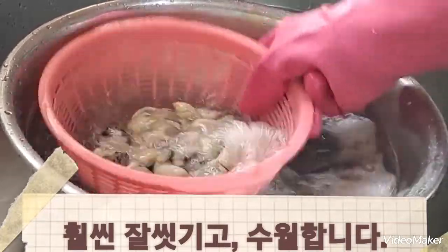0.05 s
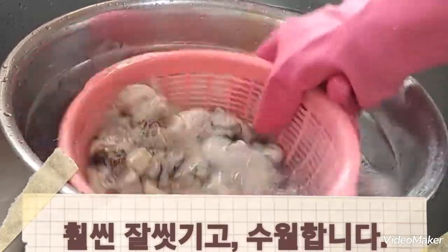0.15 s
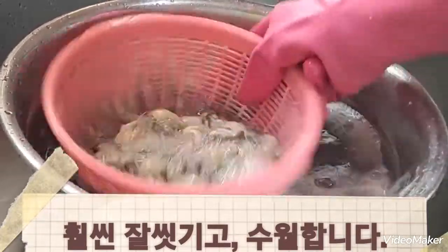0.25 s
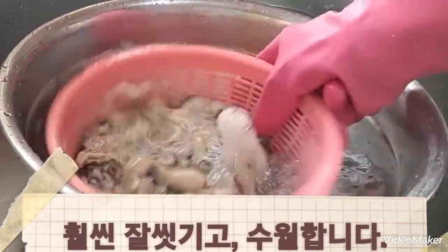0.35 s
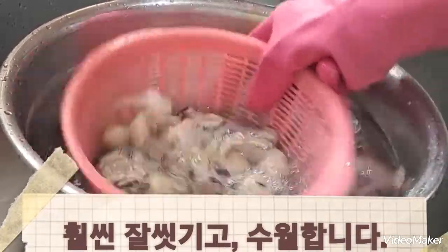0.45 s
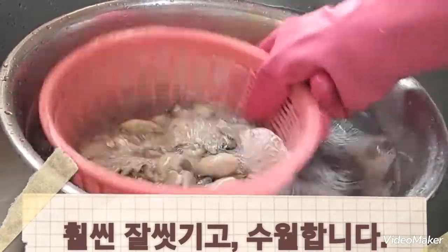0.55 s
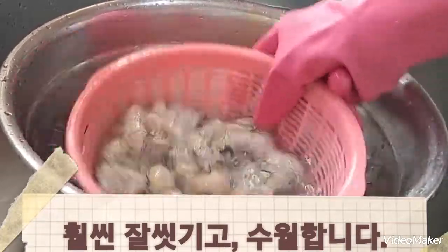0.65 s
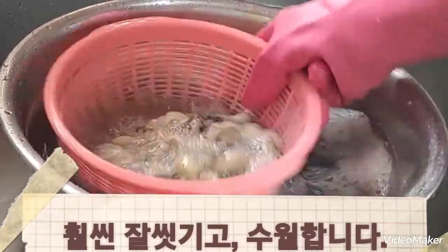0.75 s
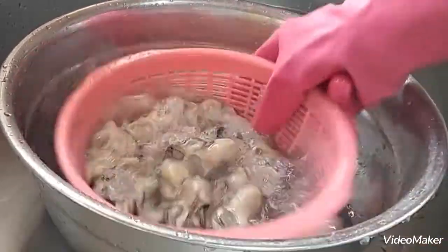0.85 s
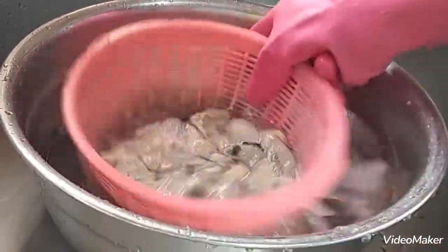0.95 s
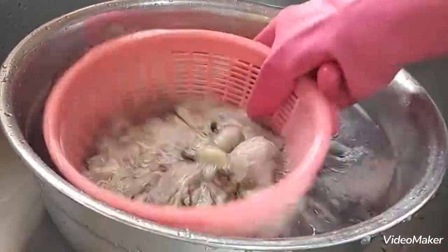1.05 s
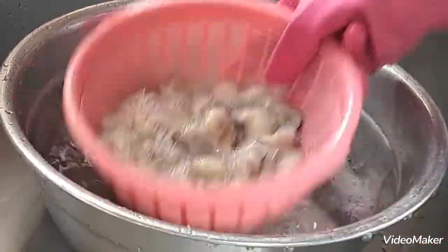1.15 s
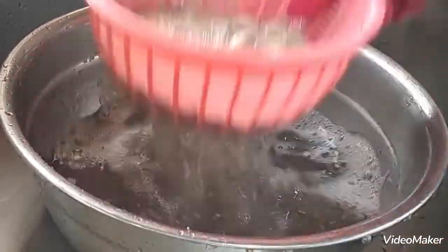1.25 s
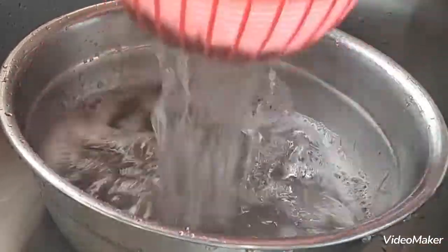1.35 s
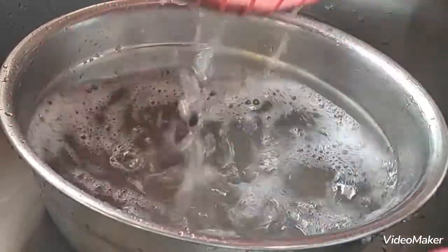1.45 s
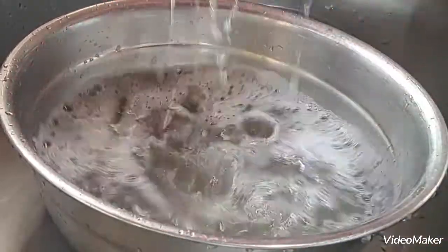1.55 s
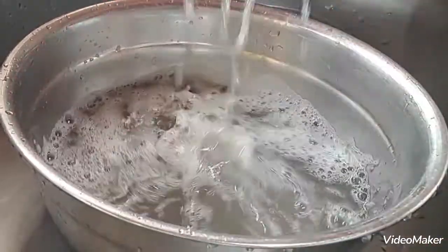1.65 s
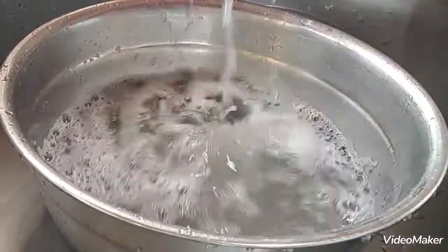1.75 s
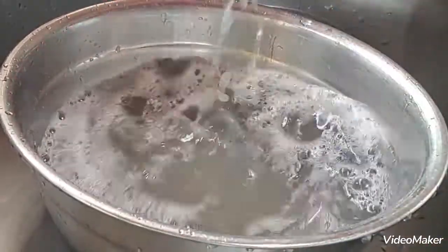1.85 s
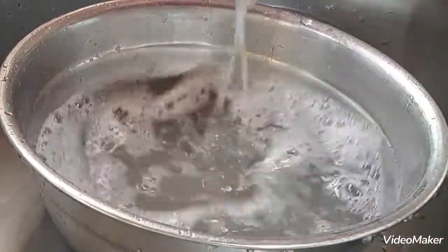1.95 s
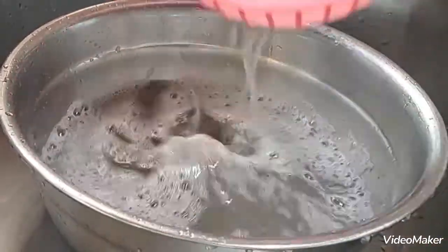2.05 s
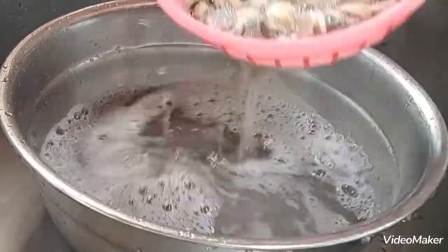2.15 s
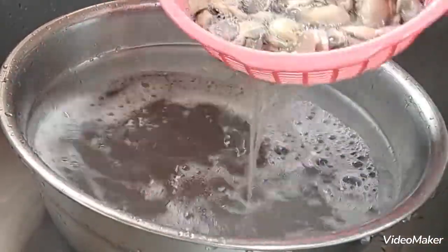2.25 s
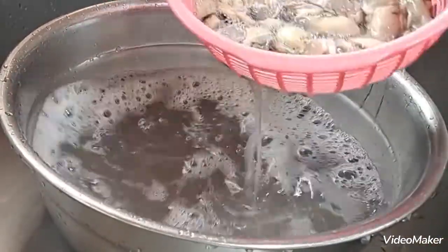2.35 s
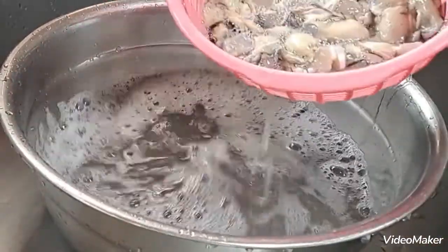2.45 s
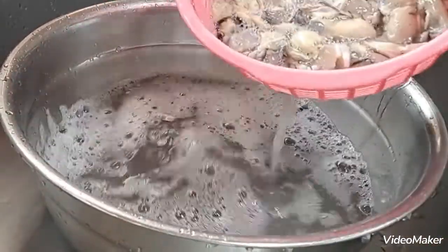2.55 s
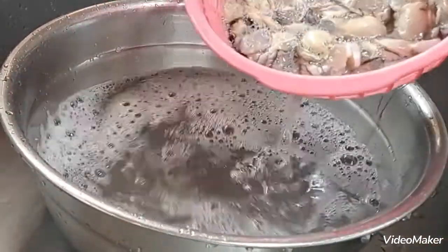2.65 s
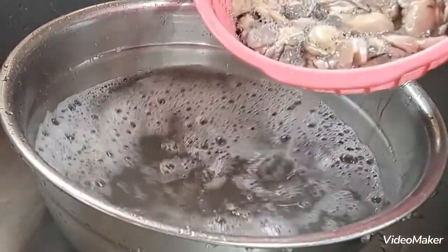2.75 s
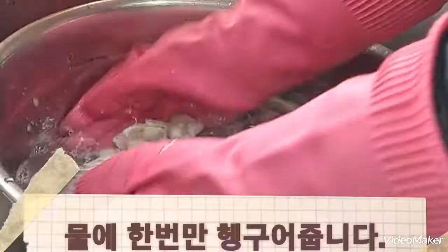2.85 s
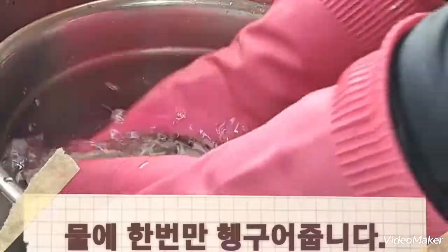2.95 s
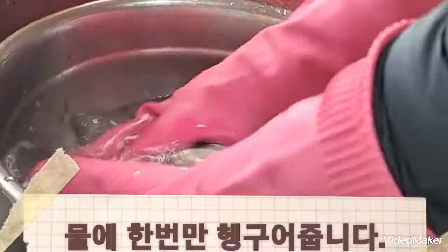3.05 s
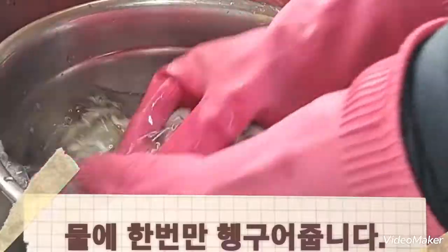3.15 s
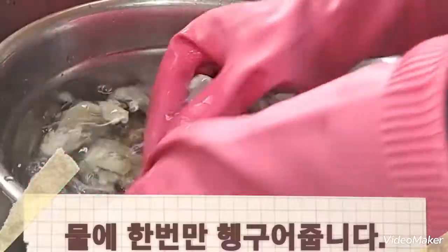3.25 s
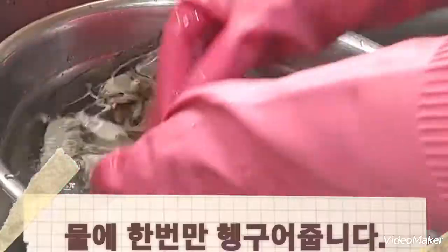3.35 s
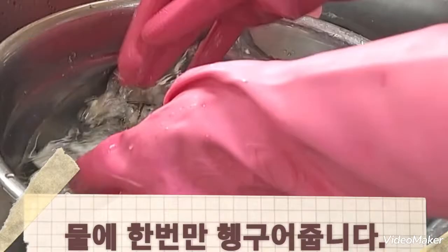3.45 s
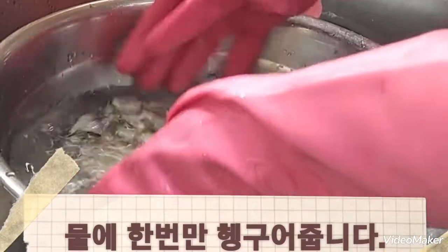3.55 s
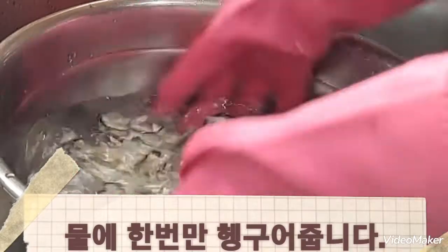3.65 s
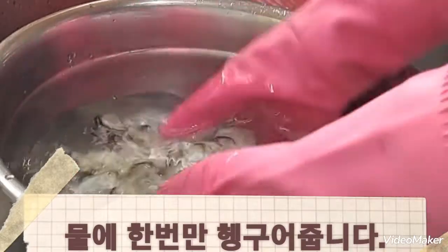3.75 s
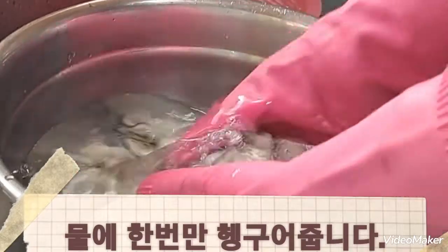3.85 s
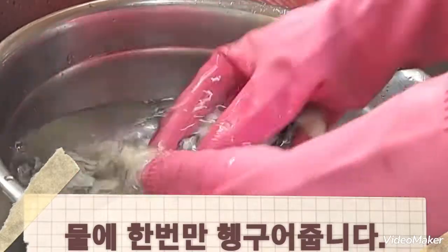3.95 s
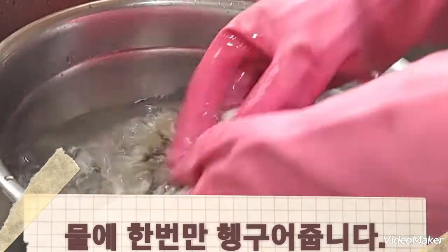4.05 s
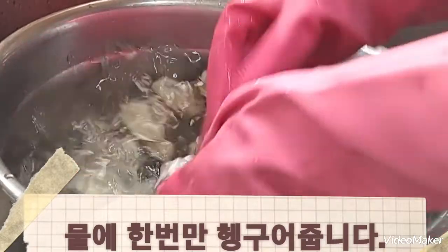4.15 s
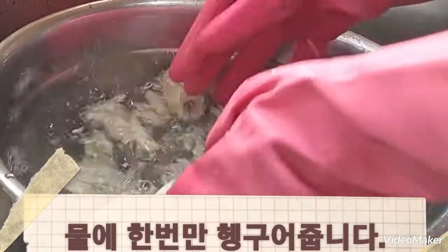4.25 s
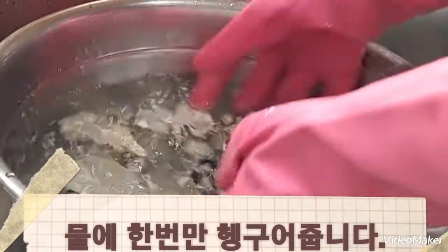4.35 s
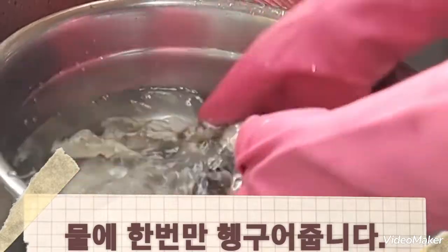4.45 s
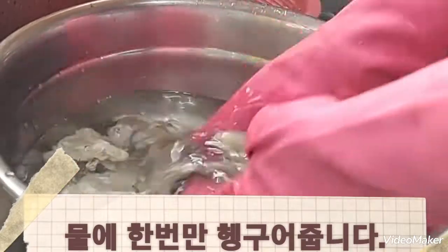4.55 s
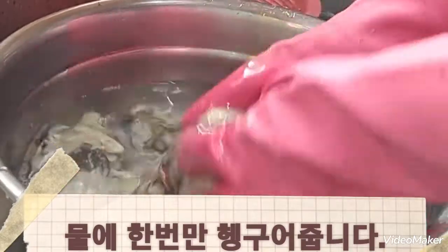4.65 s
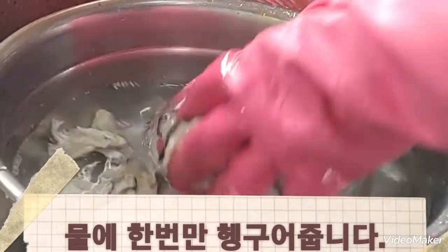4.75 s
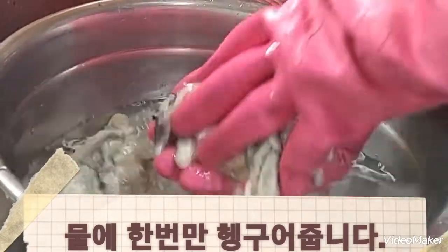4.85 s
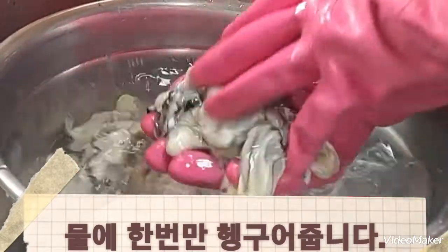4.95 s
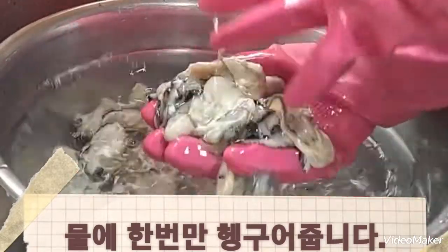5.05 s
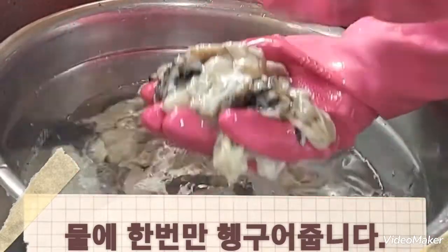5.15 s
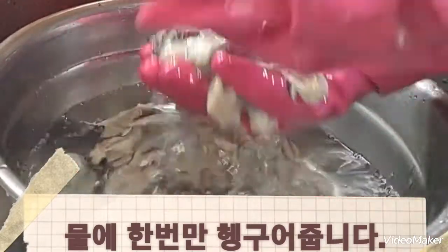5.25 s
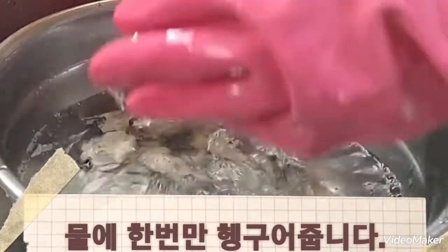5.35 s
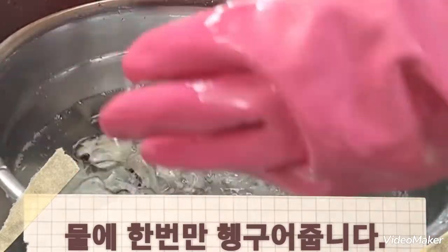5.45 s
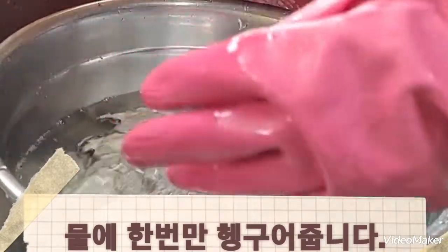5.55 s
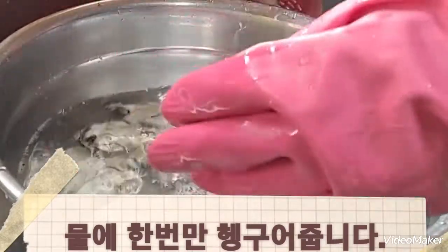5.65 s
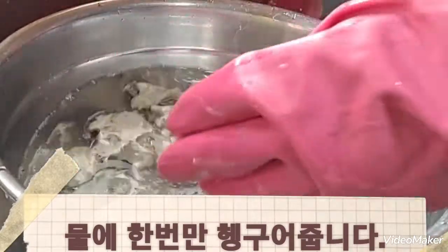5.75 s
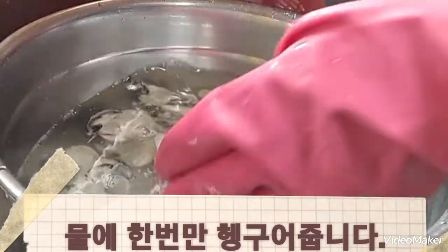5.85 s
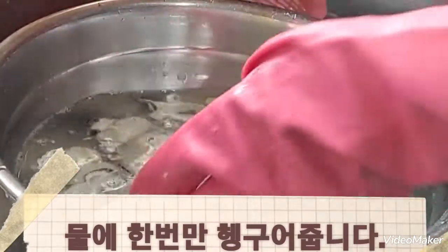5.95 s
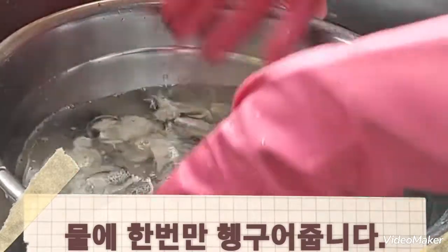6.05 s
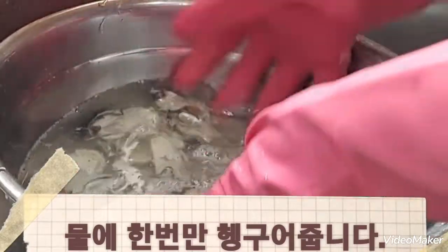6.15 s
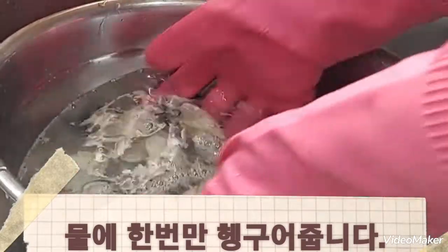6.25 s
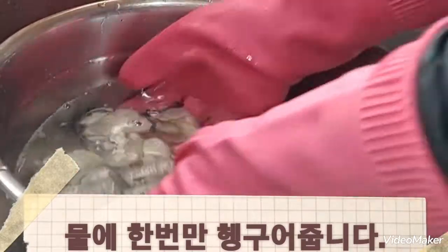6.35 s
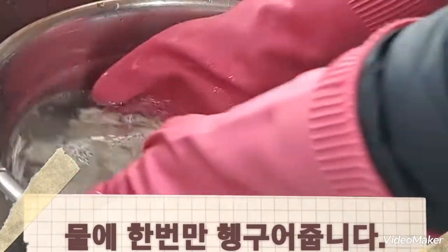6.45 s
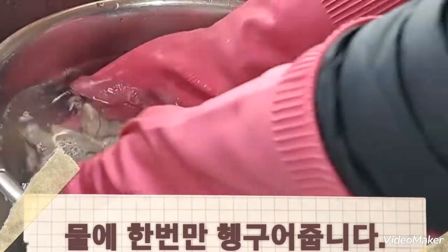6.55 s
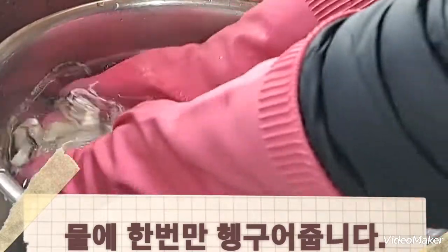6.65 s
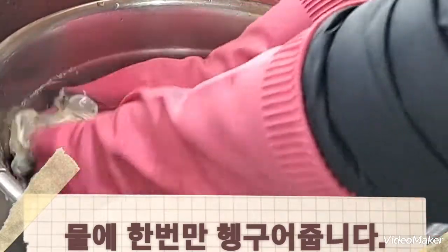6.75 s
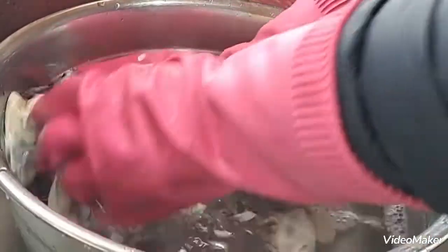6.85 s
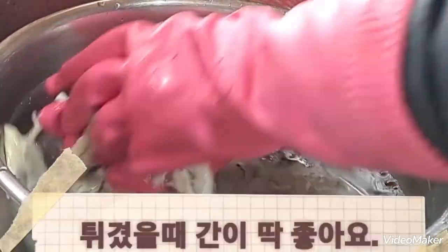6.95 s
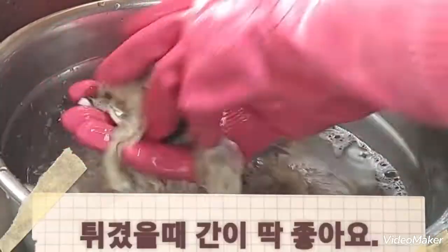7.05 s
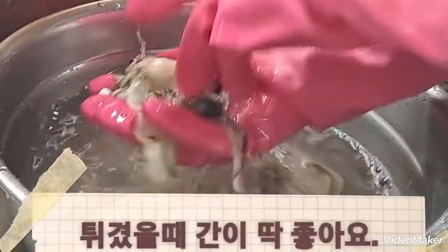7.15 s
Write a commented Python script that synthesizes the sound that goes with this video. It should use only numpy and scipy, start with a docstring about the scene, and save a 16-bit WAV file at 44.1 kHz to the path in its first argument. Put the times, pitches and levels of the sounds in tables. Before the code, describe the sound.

Shellfish swished in a plastic colander thump rhythmically in a steel basin of water, then drain and are splashed about by hand.

```python
"""In a small kitchen, shellfish are rinsed in a steel basin of water. A plastic colander knocks the basin floor,
is lifted and drains; then gloved hands turn the food over. Struck modes ring as decaying sines, trapped air as
sines that climb in pitch, drops as short noise bursts and ticks. Shaped noise makes the surge, churn and spray,
and banded noise the rushing and slopping water. The level of the whole sound dips twice, briefly."""
import sys
import numpy as np
from scipy import signal
from scipy.fft import rfft, irfft, next_fast_len
from scipy.io import wavfile

SR = 44100
rng = np.random.default_rng(int(sys.argv[2]) if len(sys.argv) > 2 else 0)


def put_to_file(sound):
    """Save the sound as 16-bit audio at rate SR, in the file named by the first command-line argument."""
    columns = np.atleast_2d(sound).T  # one column per channel
    safe = np.clip(columns, -1, 1)
    whole_steps = np.round(safe * 32767)
    wavfile.write(sys.argv[1], SR, whole_steps.astype(np.int16))


N = 317520

# Blows on the basin. Each row: time in seconds, relative drive of the floor modes in dB, of the wall modes in dB.
KNOCK_ROWS = [(0.164, -9, -22), (0.401, -9.5, -22.5), (0.649, -11.5, -27.5), (0.889, -8.5, -22),
              (1.085, -15.5, -29), (1.503, -36, -43), (3.905, -22, -65), (5.786, -25, -28.5),
              (5.874, -21, -13.5), (5.917, -25, -19)]
COLANDER_OUT_S = 1.2        # until then every blow is a stroke of the colander
LEFT_DB, LEFT_LAG = -2.3, 2   # the basin sits nearer the right side (dB, samples)


def from_db(db):
    """Amplitude ratio: 20 dB stand for a factor of ten."""
    return 10 ** (np.asarray(db) / 20)


def rms_one(x):
    """Normalization to unit mean power."""
    return x / np.sqrt(np.mean(x ** 2) + 1e-20)


def in_time(rows):
    """Linear interpolation of every column over the times in the first."""
    s, *columns = np.transpose(rows)
    return [np.interp(np.arange(N) / SR, s, column) for column in columns]


def drift(rate_hz):
    """Low-passed chance: two equal poles at the rate leave a slow wander with spread 1."""
    step = 40   # samples between computed points
    r = np.exp(-2 * np.pi * rate_hz * step / SR)
    white = rng.standard_normal(N // step + 2002)
    slow = signal.lfilter([1], [1, -2 * r, r * r], white)[2000:]   # the start-up is left out
    return np.interp(np.arange(N) / step, np.arange(len(slow)), rms_one(slow))


def coloured(x, spectrum):
    """Spectral shaping: white input takes on the given spectrum, at rms 1."""
    hz, db = np.transpose(spectrum)
    grid = np.maximum(np.arange(N // 2 + 1) * SR / N, 1)
    gain_db = np.interp(np.log(grid), np.log(hz), db, left=-90, right=-90)
    return rms_one(irfft(rfft(x) * from_db(gain_db), N))


def ring(clicks, hz, t60):
    """Damped resonance: a unit click sets a sine of height 1 ringing, 60 dB down after t60 seconds."""
    r, w = from_db(-60 / (t60 * SR)), 2 * np.pi * hz / SR
    return signal.lfilter([0, np.sin(w)], [1, -2 * r * np.cos(w), r * r], clicks + 1e-18)


def add(out, sound, s, pan_db=LEFT_DB, lag=LEFT_LAG):
    """Stereo by level and arrival time: a mono sound enters both channels, later on the left."""
    for side, start, db in zip(out, [int(s * SR) + lag, int(s * SR)], [pan_db / 2, -pan_db / 2]):
        side[start:start + len(sound)] += sound[:max(N - start, 0)] * from_db(db)


def spread(white, alike, lag=LEFT_LAG):
    """Partial coherence: of three noise draws one is shared by both channels, one is own to each."""
    out = np.sqrt(1 - alike) * white[1:] * from_db([[LEFT_DB / 2], [-LEFT_DB / 2]])
    add(out, np.sqrt(alike) * white[0], 0, lag=lag)
    return out


def patchy(x, edges_hz, patchy_db, rate):
    """Independent modulation: every frequency band swells and sinks on its own."""
    total = 0
    for k, edges in enumerate(zip(edges_hz, edges_hz[1:])):
        band = signal.butter(2, edges, "band", fs=SR, output="sos")
        swell = from_db(patchy_db * drift(rate))
        total = total + (-1) ** k * swell * signal.sosfilt(band, x)
    return total


def bursts(rows, width_octaves, rise_s, alike, lag=LEFT_LAG):
    """Transient noise: a band rises fast and dies; rows of (seconds, dB, centre Hz, t60 in seconds)."""
    out = np.zeros((2, N))
    for s, db, hz, t60 in rows:
        t = np.arange(int(np.clip(t60, .01, 1 / 3) * SR)) / SR
        white = rng.standard_normal((2, len(t)))
        edges = np.clip([hz / 2 ** width_octaves, hz * 2 ** width_octaves], 20, .45 * SR)
        noise = signal.sosfilt(signal.butter(2, edges, "band", fs=SR, output="sos"), white)
        shape = from_db(db) * (1 - np.exp(-t / rise_s)) * from_db(-60 * t / t60)
        add(out, shape * rms_one(noise[0]), s, lag=lag)
        wall_pan_db = LEFT_DB + 12 * rng.choice([-1, 1])   # scattered off one wall
        add(out, (1 - alike) * shape * rms_one(noise[1]), s, wall_pan_db, 0)
    return out


def wash(surge_db, churn_db, spray_db, fizz_share=0.5):
    """Turbulent water as filtered noise: lumpy surge, churning hiss, and spray with dense tiny pops."""
    # Spectra of the three. Each row: frequency in Hz, relative level in dB per Hz.
    surge_spectrum = [(25, -12), (44, -6), (123, -5), (320, -6), (487, -9.5), (800, -17), (1500, -24)]
    churn_spectrum = [(300, -13), (764, -20), (1340, 0), (2220, 8.5), (4000, -0.5), (7000, -29),
                      (9100, -30)]
    spray_spectrum = [(1470, -19), (2500, 2.5), (3800, 5.5), (6060, 1.5), (8530, 2), (9960, -3.5),
                      (13000, 2.5), (17000, -9.5)]
    fizz_per_s = 1500

    surge = coloured(spread(rng.standard_normal((3, N)), alike=0.75), surge_spectrum)
    surge = from_db(surge_db + 2.5 * drift(5)) * surge

    patches_db = 1.5 * drift(12)   # shared by churn and spray
    churn = coloured(spread(rng.standard_normal((3, N)), alike=0.1), churn_spectrum)
    churn = patchy(churn, 400 * 1.89 ** np.arange(6), patchy_db=3.5, rate=25)
    hiss_db = churn_db - 9         # most of the churn is heard as bubbles
    churn = from_db(hiss_db + patches_db) * churn

    pop_height = from_db(8 * np.minimum(rng.exponential(1, N), 4)) * rng.choice([-1, 1], N)
    pops = (rng.random(N) < fizz_per_s / SR) * pop_height
    fizz = rng.standard_normal((3, N))
    fizz[0] += fizz_share * rms_one(pops)
    spray = coloured(spread(fizz, alike=0.65, lag=0), spray_spectrum)
    spray = patchy(spray, 2000 * 2 ** np.arange(0, 3.3, .8), patchy_db=2.6, rate=32)
    spray = from_db(spray_db + patches_db + 2.5 * drift(25)) * spray
    return surge + churn + spray


def basin(surge_db, soft_hz=400, rub_db=-32):
    """Modal resonance: blows strike floor and wall modes, the wall chatters on, surging water keeps all humming."""
    # Modes of the water-loaded steel. Each row: frequency in Hz, relative level in dB, t60 in seconds.
    # Neighbours have opposite sign, so a close pair swells and beats.
    floor_modes = [(76, -21, 0.19), (114.3, 0, 0.23), (127.3, 2.5, 0.19), (183.5, -9.5, 0.26),
                   (210.5, -12, 0.17), (245.4, -17, 0.41)]
    wall_modes = [(325, -3, 0.16), (354, -4, 0.15), (431, -6, 0.1), (484, -4, 0.09), (549, -5, 0.08),
                  (620, -6, 0.06), (700, -8, 0.05), (790, -10, 0.05), (900, -9, 0.05), (1010, -9, 0.05),
                  (1170, -7, 0.05), (1390, -9, 0.05)]
    floor_lag_s = 0.0037   # the floor gives late
    chatter_db, chatter_t60_s, wall_pan_db = -25.5, 0.19, -7.5

    s, floor_db, wall_db = np.transpose(KNOCK_ROWS)
    water = from_db(surge_db + rub_db) * rng.standard_normal(N)
    blows = np.zeros(N)
    blows[(s * SR).astype(int)] = from_db(wall_db + chatter_db)
    chatter = signal.lfilter([1], [1, -from_db(-60 / (chatter_t60_s * SR))], blows + 1e-18)

    out = np.zeros((2, N))
    soft = np.exp(-2 * np.pi * soft_hz / SR)
    floor = (floor_modes, floor_lag_s, floor_db, 0, LEFT_DB)
    wall = (wall_modes, 0, wall_db, chatter, wall_pan_db)
    for modes, late, blow_db, rattle, pan_db in [floor, wall]:
        body = np.zeros(N)
        for k, (hz, db, t60) in enumerate(modes):
            force = water + rattle * rng.standard_normal(N)
            force[((s + late) * SR).astype(int)] += from_db(blow_db + rng.normal(0, 1.5, len(s)))
            body += (-1) ** k * from_db(db) * ring(force, hz, t60)
        softened = signal.lfilter([1 - soft], [1, -soft], body)   # plastic and water soften the contact
        add(out, softened, 0, pan_db)
    return out


def bubble(hz, cycles, rise, swell_cycles=3):
    """Volume pulsation: an air pocket swells, rings and climbs in pitch as it nears the surface."""
    t = np.arange(int(cycles / hz * SR)) / SR
    # phase wanders in turns per cycle: the pocket is never quite round
    wobble = 0.05 * np.cumsum(rng.standard_normal(len(t))) * np.sqrt(hz / SR)
    turns = hz * t * (1 + rise * t * hz / cycles) + wobble
    shape = (1 - np.exp(-t * hz / swell_cycles)) * from_db(-60 * t * hz / cycles)
    return np.sin(2 * np.pi * turns) * shape / shape.max()


def bubbles(churn_db, small_db=-2.0):
    """Superposed pulsating pockets: single loud ones, and a random crowd in clumps that follows the churn."""
    # The loudest pockets. Each row: start in seconds, level in dB, starting pitch in Hz.
    loud_pockets = [(0.993, -27.5, 1320), (1.198, -29.5, 1070), (1.501, -22.5, 1670), (1.884, -22.5, 1240),
                    (1.932, -25, 1030), (1.961, -21.5, 2190), (1.98, -23, 2950), (2.028, -27.5, 930),
                    (2.054, -26, 4550), (2.136, -21.5, 2580), (2.159, -26.5, 2040), (2.199, -28, 1380),
                    (2.253, -22, 1580), (2.358, -25.5, 1350), (2.993, -22.5, 1940), (2.91, -28.5, 1050),
                    (3.09, -29.5, 2030), (3.134, -27.5, 1420), (3.175, -19, 900), (3.214, -23.5, 1290),
                    (3.256, -21, 3180), (3.273, -27, 710), (3.348, -17, 2270), (3.436, -20.5, 4640),
                    (3.472, -23.5, 2170), (3.495, -18.5, 3060), (3.716, -17.5, 3550), (3.774, -16.5, 1044),
                    (3.799, -21.5, 2950), (3.851, -24.5, 2050), (3.932, -25, 1330), (4.04, -20, 3880),
                    (4.063, -18, 1380), (4.081, -21, 1810), (4.107, -18.5, 644), (4.196, -31, 1270),
                    (4.22, -23.5, 1850), (4.454, -34, 1440), (4.485, -34, 1310), (4.535, -24, 2240),
                    (4.557, -23, 1770), (4.623, -17, 2930), (4.667, -32, 970), (4.74, -22, 1880),
                    (4.84, -29.5, 706), (4.839, -27, 1380), (4.921, -17.5, 3600), (4.947, -24, 2150),
                    (5.175, -31, 1740), (5.256, -33, 1690), (5.279, -24.5, 2130), (5.421, -33.5, 1770),
                    (5.476, -24, 2190), (5.724, -22.5, 2480), (5.843, -28, 1510), (6.322, -33, 2860),
                    (6.396, -26, 2160), (6.517, -30, 1460), (6.86, -25.5, 1370), (6.72, -39, 4970),
                    (6.991, -25, 2770), (7.092, -32.5, 1550)]
    small_per_s = 480

    out = np.zeros((2, N))
    for s, db, hz in loud_pockets:
        rise, side = rng.random(2)
        cycles = 22 * hz / 1500   # every loud pocket rings for the same time
        sound = from_db(db) * bubble(hz, cycles, 0.1 * rise)
        add(out, sound, s, LEFT_DB + 4 * (side - .5), int(4 * side))

    crowd_db = churn_db + small_db + 2 * drift(3.8) + 3 * drift(25)
    for when, pitch, size, life, side in rng.random((int(small_per_s * N / SR), 5)):
        s = when * N / SR
        size_spread_db = 1.5 if s < COLANDER_OUT_S else 5   # in open water a few stand far above the rest
        db = crowd_db[int(when * N)] - size_spread_db * np.log(1 - .97 * size) - 1.5 * pitch
        sound = from_db(db) * bubble(800 * 6.5 ** pitch, 9.0 + 22 * life * pitch, 0.2 * life)
        add(out, sound, s, LEFT_DB + 8 * (side - .5), int(6 * side))
    return out


def drops(spray_db):
    """Impact noise: loud drops each splash and tick, and a random spatter of small ones follows the spray."""
    # The loudest drops. Each row: start in seconds, splash level in dB, splash centre in Hz,
    # relative level of the tick of impact in dB.
    loud_drops = [(0.116, -23, 3170, -43), (0.1994, -28, 4570, -35), (1.5272, -26.5, 7340, -36),
                  (1.775, -30, 6500, -28), (1.862, -23, 5800, -32), (1.922, -17.5, 5140, -31),
                  (1.9727, -15.5, 6550, -51), (1.998, -17.5, 5730, -49), (2.141, -17.5, 9100, -25.5),
                  (2.168, -19, 3350, -28), (2.195, -31, 5340, -30), (2.2533, -21.5, 5660, -27.5),
                  (2.3505, -12, 6400, -46), (2.944, -15, 6100, -37), (2.974, -22, 6800, -32),
                  (3.1733, -24, 5450, -50), (3.239, -26, 3310, -27.5), (3.337, -17, 3060, -27),
                  (3.3964, -21, 5500, -38), (3.437, -27, 4740, -30), (3.69, -15.5, 4100, -47),
                  (3.78, -18, 5460, -32), (3.924, -24, 6450, -49), (4.0824, -27, 3300, -29),
                  (4.1388, -16.5, 4470, -43), (4.2193, -17, 3960, -46), (4.2945, -19, 6900, -21.5),
                  (4.568, -6, 5500, -22), (4.6943, -24, 6260, -31), (4.868, -21, 4890, -31),
                  (4.923, -10, 3800, -23), (5.0198, -16, 5600, -42), (5.7204, -12, 3570, -38),
                  (5.7863, -23, 6950, -25), (6.859, -20, 6360, -48), (6.9422, -14, 3730, -27),
                  (6.992, -17, 4960, -43), (7.183, -24, 7360, -34)]
    spatter_per_s, spatter_db, size_spread_db, spatter_t60_s = 53, -2.5, 5.5, 0.018

    when, size, pitch = rng.random((int(spatter_per_s * N / SR), 3)).T
    level_db = spray_db[(when * N).astype(int)] + spatter_db - size_spread_db * np.log(1 - .97 * size)
    centre_hz = 2000 * 6 ** pitch
    spatter = [(s, db, hz, spatter_t60_s) for s, db, hz in zip(when * N / SR, level_db, centre_hz)]
    splashes = [(s, db - 7.5, hz, .028) for s, db, hz, _ in loud_drops]   # from crest to burst level
    ticks = [(s, tick_db + 2.5, 11000, .011) for s, _, _, tick_db in loud_drops]

    out = bursts(spatter, width_octaves=0.27, rise_s=0.0012, alike=0.15, lag=0)
    out += bursts(splashes, width_octaves=0.33, rise_s=0.0021, alike=0.16, lag=0)
    return out + bursts(ticks, width_octaves=0.75, rise_s=0.0004, alike=0.2, lag=0)


def rushes():
    """Flow noise: water rushes through the colander and between the fingers, and breaks into droplets."""
    # One colander stroke, going down before a blow and coming up after it. Each row: seconds from the blow,
    # level in dB before the strokes grow gentler, centre in Hz, t60 in seconds.
    stroke_rows = [(-.053, -34, 2120, 0.32), (0.078, -30, 1630, 0.12)]
    # Water between the fingers. Each row: start in seconds, level in dB, centre in Hz, half width in octaves.
    finger_rows = [(2.945, -37, 2740, 1.9), (3.199, -34.5, 2190, 1.2), (4.03, -28.5, 1530, 1.22),
                   (4.475, -45, 2580, 0.92), (5.775, -30.5, 2900, 1.5), (6.264, -44, 5400, 0.33),
                   (6.296, -43.5, 3100, 0.41), (6.823, -42.5, 4200, 0.4)]
    fade_db_per_s, rise_s, finger_t60_s = -6.5, 0.0079, 0.33

    strokes = []
    for s, *_ in KNOCK_ROWS:
        if s < COLANDER_OUT_S:
            strokes += [(s + dt, db + fade_db_per_s * s, hz, t60) for dt, db, hz, t60 in stroke_rows]
    rush = bursts(strokes, width_octaves=0.99, rise_s=rise_s, alike=0.15)
    for s, db, hz, octaves in finger_rows:
        rush += bursts([(s, db, hz, finger_t60_s)], octaves, rise_s, alike=0.1)
    return patchy(rush, 300 * 1.6 ** np.arange(9), patchy_db=6, rate=70)   # lumps of droplets


def cracks():
    """Contact noise: every blow adds a short dull band and a sharper bright one."""
    dull = [(s, db - 11.5, 750, .045) for s, db, _ in KNOCK_ROWS]
    bright = [(s, db - 26.0, 4000, .04) for s, db, _ in KNOCK_ROWS]
    out = bursts(dull, width_octaves=0.87, rise_s=0.002, alike=0.37)
    return out + bursts(bright, width_octaves=1.1, rise_s=0.00055, alike=0.21)


def slops():
    """Low-frequency flow noise: heavy water slops against the steel with a slow onset."""
    # Each row: start in seconds, level in dB, centre in Hz, t60 in seconds.
    slop_rows = [(3.735, -21, 79, 0.41), (5.78, -4, 86, 0.18), (5.87, -14.5, 140, 0.37),
                 (6.3, -36, 55, 0.65)]
    return bursts(slop_rows, width_octaves=1.0, rise_s=0.067, alike=0.79)


def kitchen(x):
    """Reverberation by recirculation: eight feedback delays a side, duller on every round."""
    loop_t60_s, wall_cut_hz = 0.17, 7600   # the decay before the walls dull it
    size = next_fast_len(N + SR)
    w = 2 * np.pi * np.arange(size // 2 + 1) / size
    dull = 1 / (1 + 1j * w * SR / (2 * np.pi * wall_cut_hz))
    walls = np.zeros((2, len(w)), complex)
    for k, lag_s in enumerate(rng.uniform(.006, .03, 16)):
        loop = from_db(-60 * lag_s / loop_t60_s) * dull * np.exp(-1j * w * lag_s * SR)
        walls[k % 2] += (-1) ** (k // 2) * loop / (1 - loop)
    # bass reaches both sides alike, so it is kept out of the differing echoes
    thin = signal.sosfilt(signal.butter(2, 550, "high", fs=SR, output="sos"), x)
    return irfft(rfft(thin, size) * walls, size)[:, :N]


def scene():
    """Superposition: basin and water add as direct sound, the kitchen answers, and the level dips twice."""
    # Course of the water. Each row: time in seconds, surge against the steel in dB, churn of bubbles in dB,
    # spray and fizz in dB.
    water_rows = [(0.0, -42, -34.5, -46.5), (0.34, -41, -42, -47.5), (0.74, -49, -39.5, -49.5),
                  (1.08, -43, -44, -52), (1.3, -50, -52.5, -52.5), (1.84, -48.5, -49, -45),
                  (2.06, -42.5, -41.5, -43), (2.32, -42, -45, -46), (2.49, -45, -48.5, -47.5),
                  (2.69, -49.5, -49.5, -53.5), (2.87, -42.5, -42.5, -44), (3.07, -44, -47, -48.5),
                  (3.37, -48, -44, -41), (3.63, -48, -55, -57.5), (3.7, -42.5, -40.5, -48),
                  (3.95, -38.5, -40.5, -46), (4.17, -47, -41, -40), (4.35, -45.5, -49, -50.5),
                  (4.57, -39.5, -40, -46), (4.79, -44.5, -40.5, -44), (5.23, -51, -50.5, -48.5),
                  (5.5, -51, -58.5, -53), (5.72, -47, -58, -61), (5.94, -48, -55, -54),
                  (6.2, -45, -50.5, -55), (6.4, -45.5, -48.5, -50), (6.62, -47.5, -55.5, -55),
                  (6.84, -45.5, -50, -57.5), (7.02, -45, -45, -45.5), (7.2, -48.5, -50.5, -47.5)]
    # Brief dips of the whole sound. Each row: time in seconds, depth in dB, half width in seconds.
    dip_rows = [(1.763, -27, 0.013), (2.818, -21, 0.096)]

    surge_db, churn_db, spray_db = in_time(water_rows)
    near = wash(surge_db, churn_db, spray_db) + basin(surge_db)
    near += bubbles(churn_db) + drops(spray_db)
    near += rushes() + cracks() + slops()
    room_db = -12.5 + np.array([[LEFT_DB / 2], [-LEFT_DB / 2]])
    room = from_db(room_db) * kitchen(near.mean(axis=0))

    t = np.arange(N) / SR
    dip_db = sum(db * np.maximum(1 - abs(t - s) / half, 0) for s, db, half in dip_rows)
    return from_db(dip_db) * (near + room)


def record(dry):
    """Linear filtering: deep bass is reduced, the treble dips, the left channel's phase turns; the top is cut."""
    dip_hz, dip_width_hz, dip_share = 9560, 970, 0.37
    turn_hz, turn_width_hz = 3675, 1660
    dry = signal.sosfilt(signal.butter(3, 50, "high", fs=SR, output="sos"), dry)
    peak = signal.iirpeak(dip_hz, dip_hz / dip_width_hz, fs=SR)
    dry = dry - dip_share * signal.lfilter(*peak, dry)
    # an all-pass turns the left channel's phase once around
    r = np.exp(-np.pi * turn_width_hz / SR)
    poles = [1, -2 * r * np.cos(2 * np.pi * turn_hz / SR), r * r]
    turned = np.array([signal.lfilter(poles[::-1], poles, dry[0]), dry[1]])
    return signal.sosfilt(signal.ellip(10, .5, 60, 15900, fs=SR, output="sos"), turned)


dry = scene()
out = record(dry)
put_to_file(out)
```